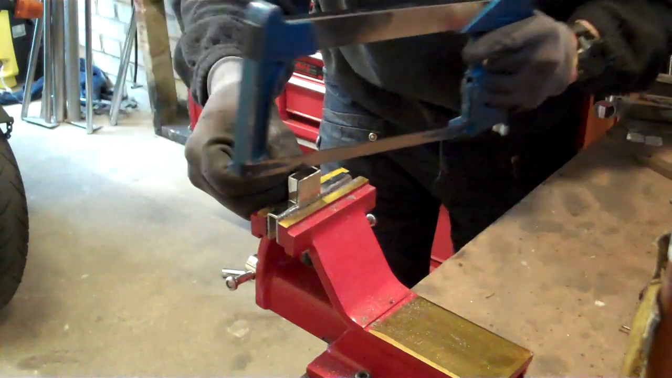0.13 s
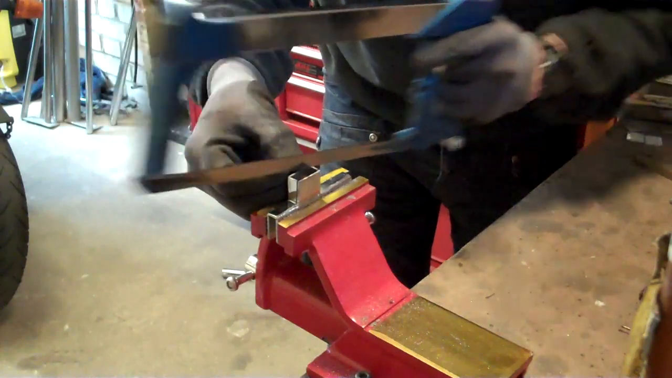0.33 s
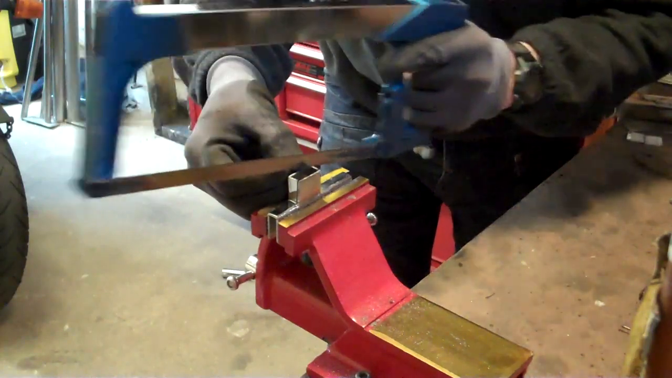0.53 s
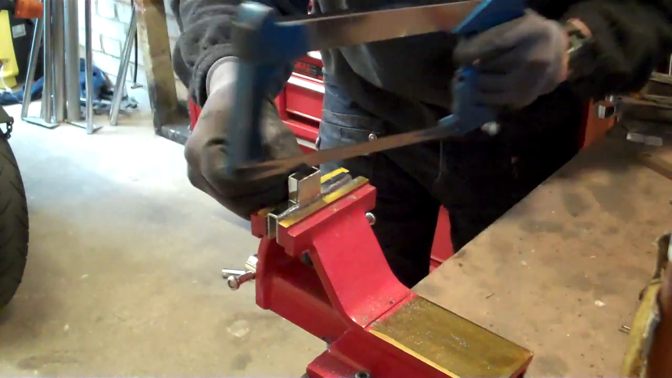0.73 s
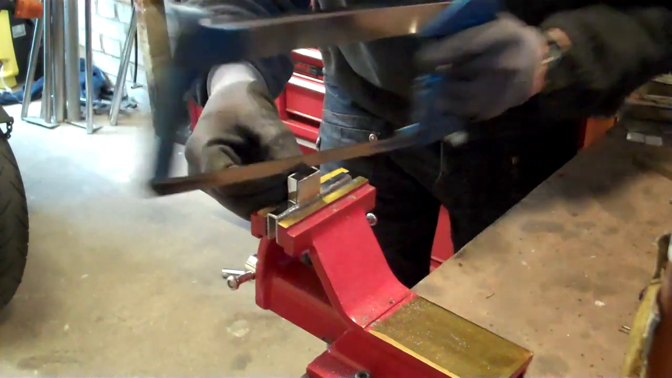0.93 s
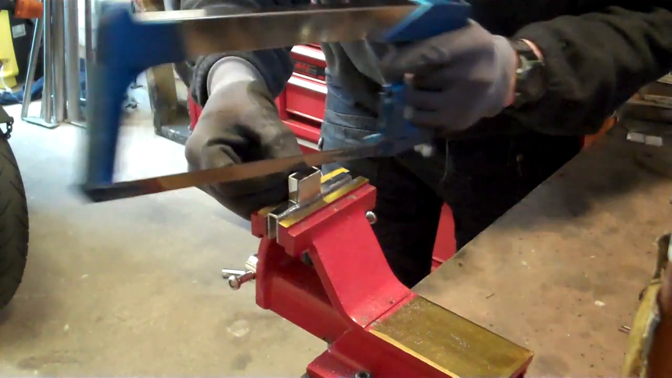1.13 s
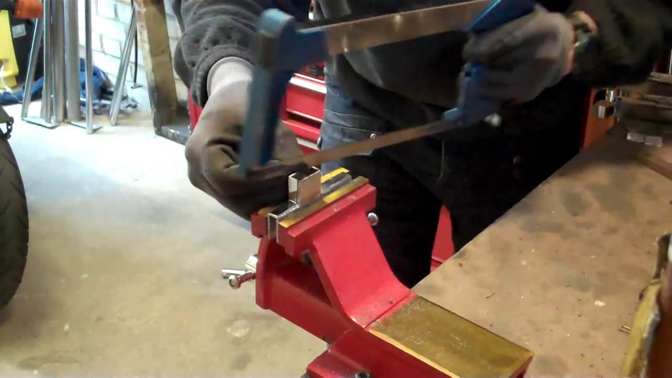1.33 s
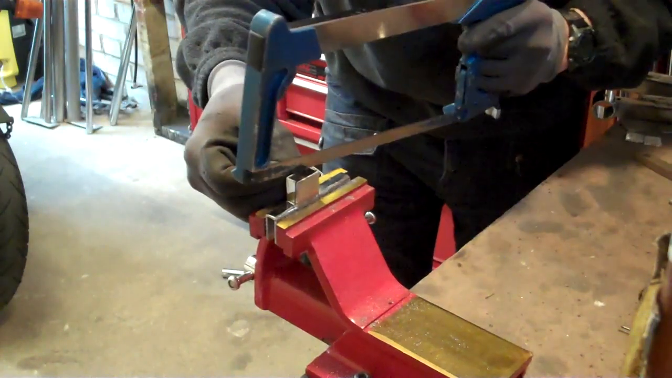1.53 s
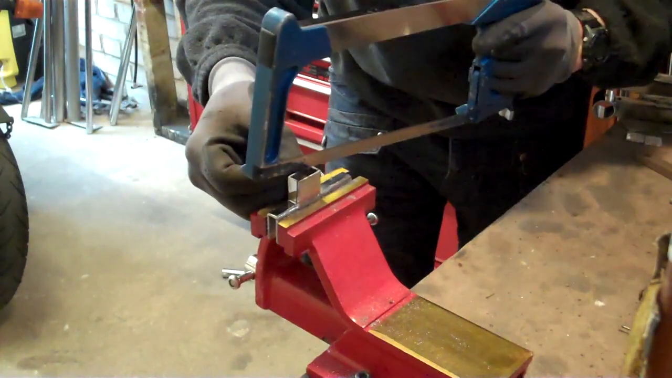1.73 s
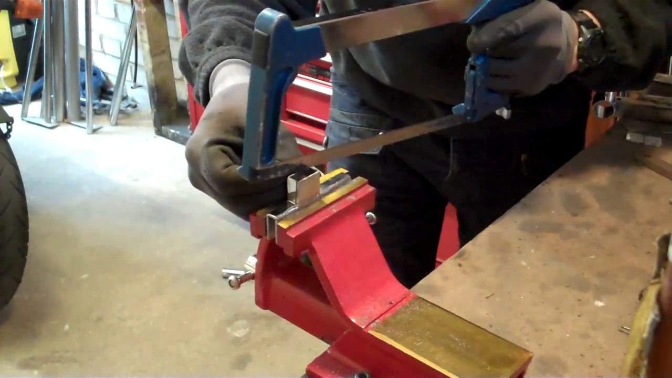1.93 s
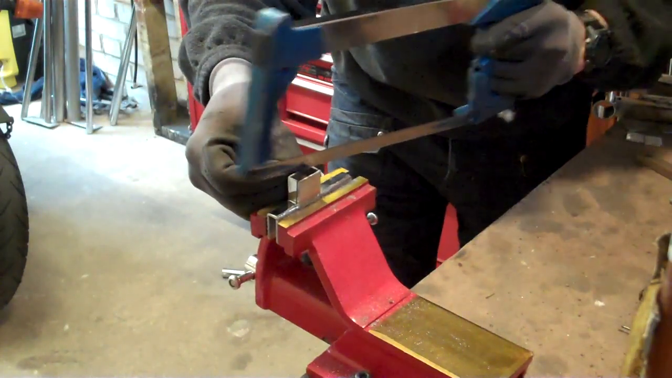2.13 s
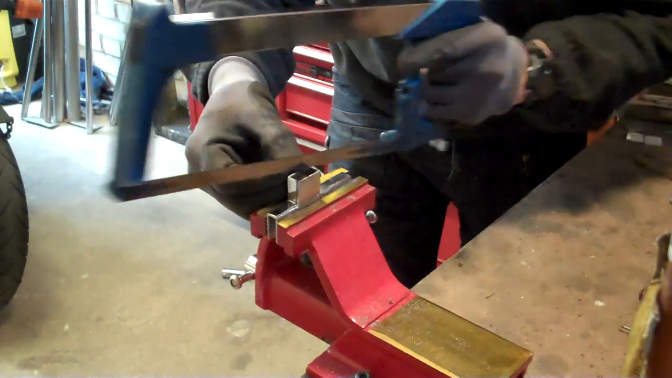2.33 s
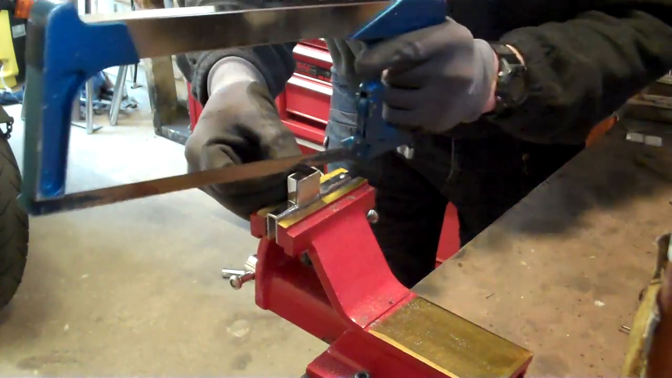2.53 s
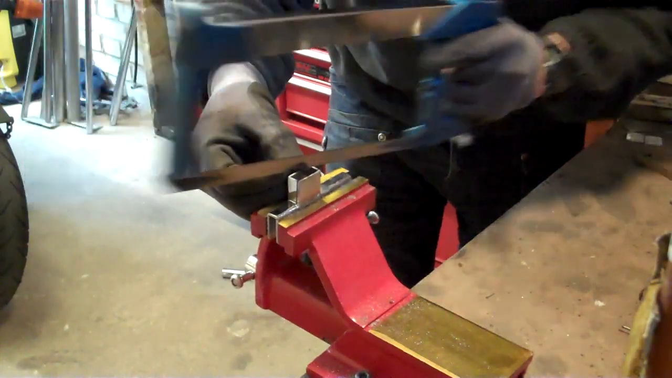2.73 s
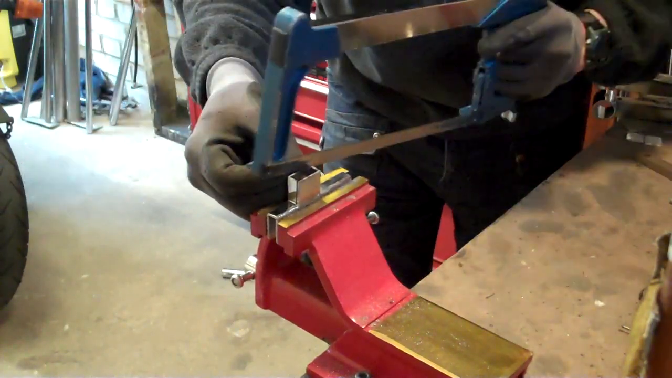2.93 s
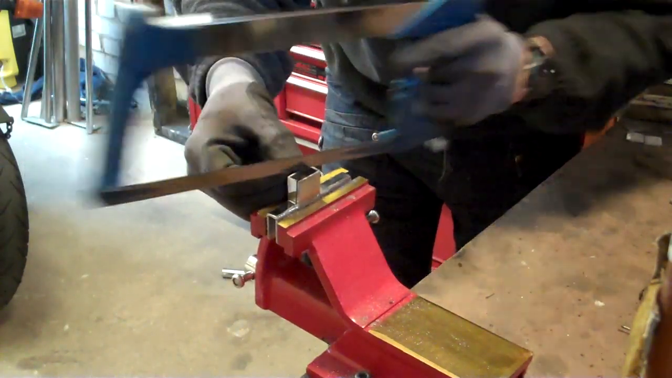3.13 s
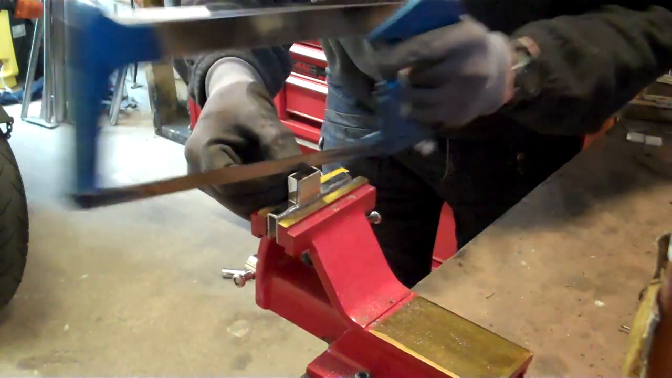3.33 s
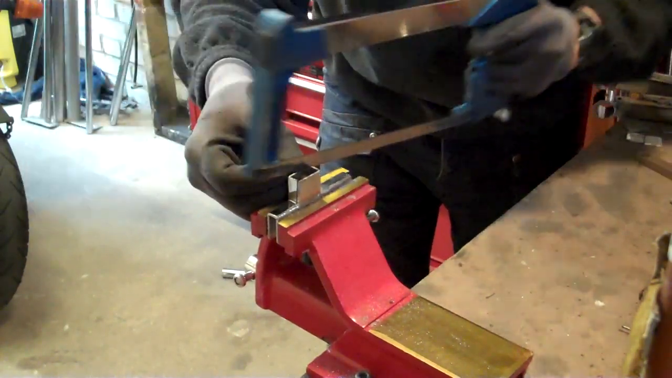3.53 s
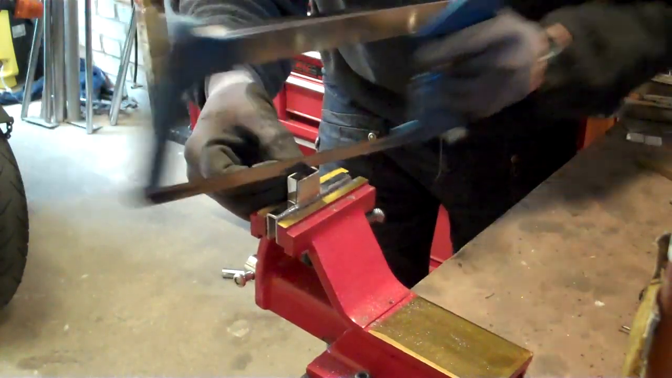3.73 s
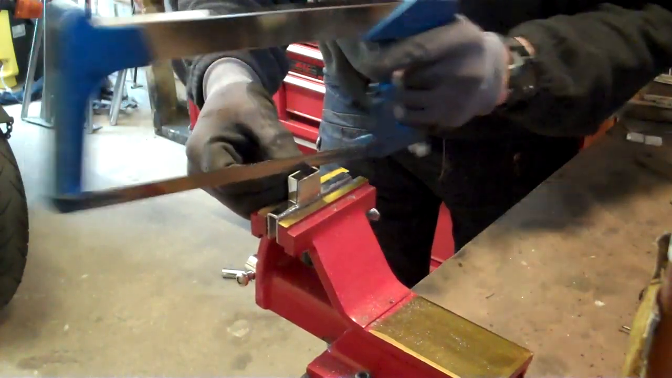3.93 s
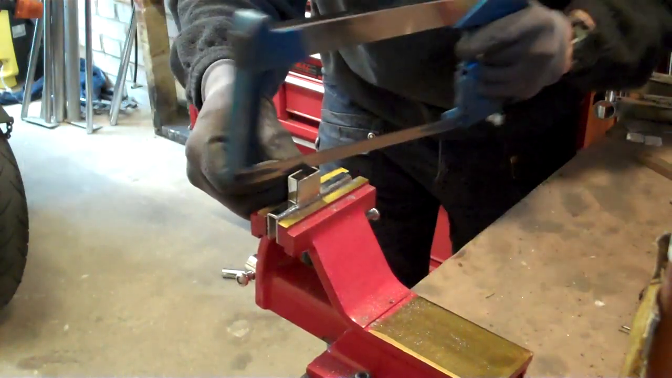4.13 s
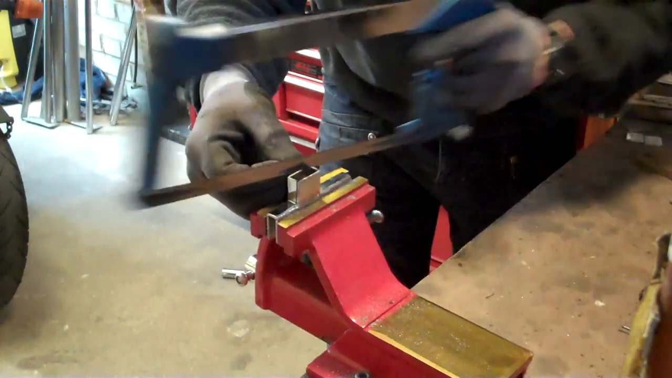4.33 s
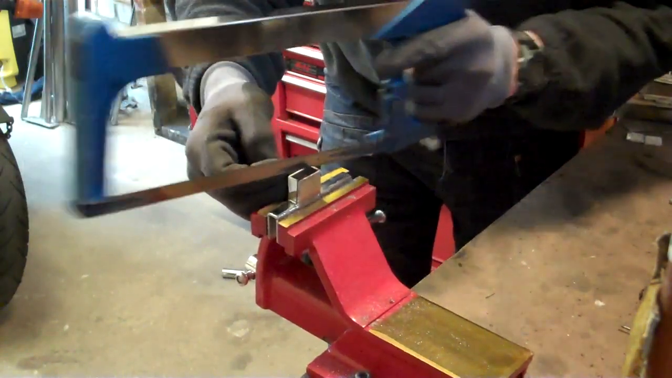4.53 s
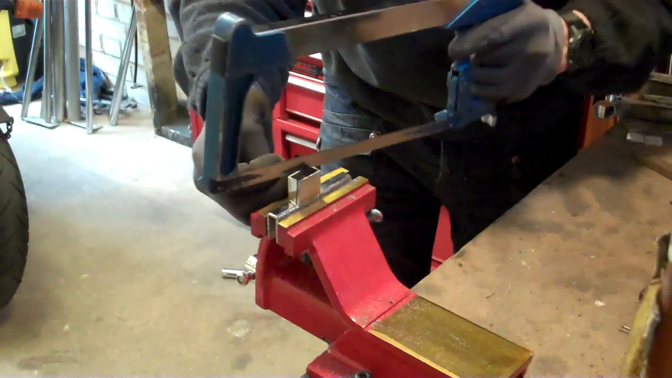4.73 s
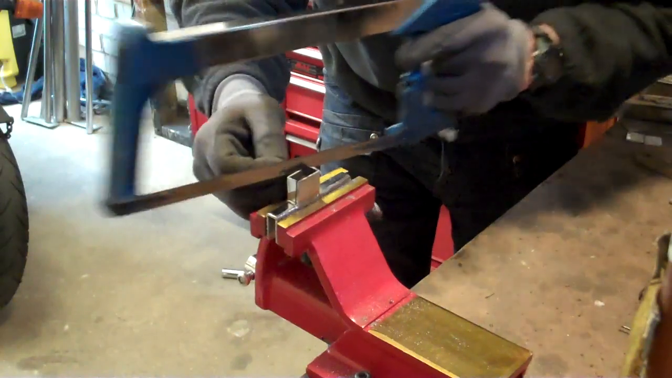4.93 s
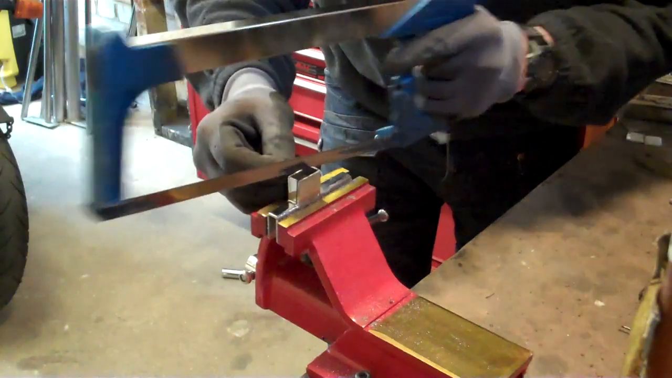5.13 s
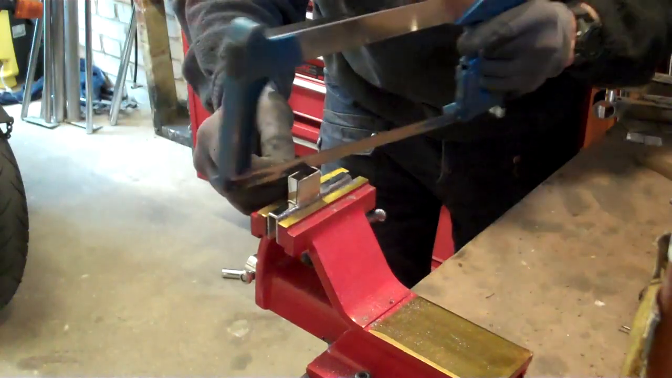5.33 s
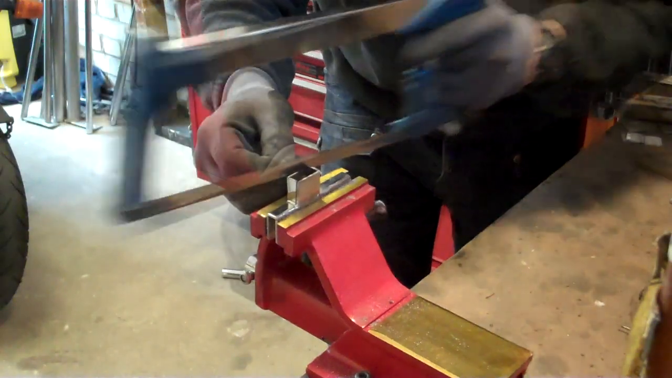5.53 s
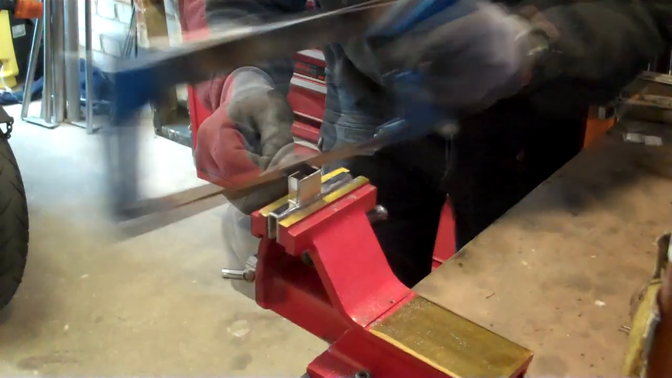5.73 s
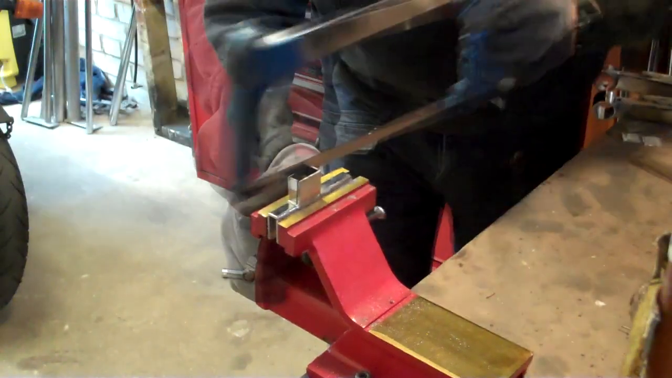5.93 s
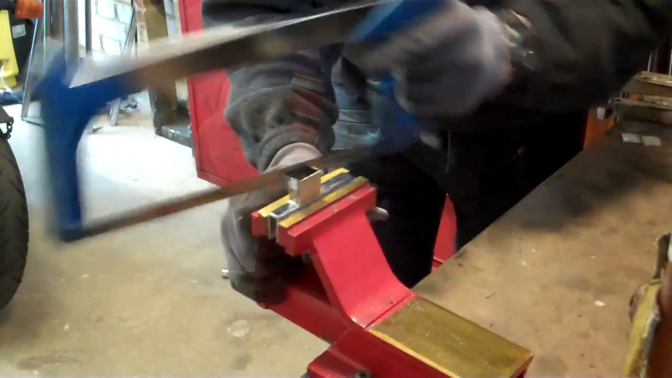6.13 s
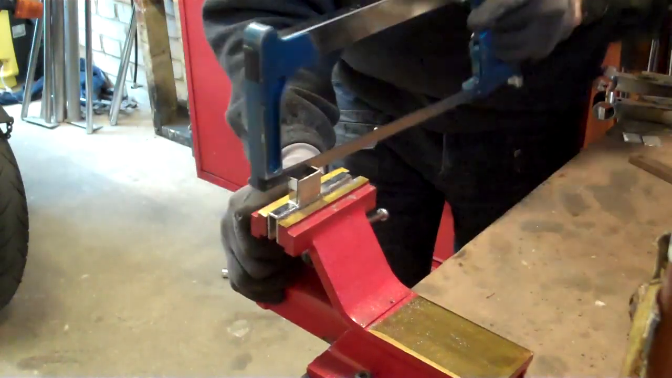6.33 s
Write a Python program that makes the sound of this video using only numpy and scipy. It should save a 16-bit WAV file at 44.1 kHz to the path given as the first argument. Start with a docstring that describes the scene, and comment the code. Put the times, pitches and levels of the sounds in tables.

```python
"""Hacksaw on a steel tube

In a garage, close to two microphone ports, a hand hacksaw cuts a tube in a bench vise and pauses once to reseat.
Tooth blows and tearing chips, paced by each stroke, drive resonant bodies: tube, blade, frame and bench.
Noise bursts and damped notes add snags, knocks, taps, low thumps and a squeak; swelling noise makes the rattles.
Short reflections surround the saw, and quiet room noise with a wavering hum lies behind it."""
import sys
import numpy as np
from scipy import signal
from scipy.fft import rfft, irfft, next_fast_len
from scipy.io import wavfile
from scipy.ndimage import uniform_filter1d, map_coordinates

SR = 44100
rng = np.random.default_rng(int(sys.argv[2]) if len(sys.argv) > 2 else 0)


def generate_wav(signal):
    """Clip the signal to [-1, 1] and save it as 16-bit WAV at the path in sys.argv[1]."""
    frames = np.transpose(np.atleast_2d(signal))
    scaled = np.clip(frames, -1, 1) * 32767
    pcm = np.round(scaled).astype(np.int16)
    wavfile.write(sys.argv[1], SR, pcm)


N = 285327

# Forward strokes. Each row: start in seconds, length in seconds, share of it spent swelling (0-1),
# then relative levels in dB of the tube ring, the blade rasp, and the frame and bench shake.
PUSHES = [(.28, .32, 0.42, -2.5, -1, 0.5), (.90, 0.31, 0.33, 0.5, .5, 1.5),
          (2.18, 0.33, 0.46, -1.5, -1, -1.5), (2.40, .25, 0.52, -5, -3.5, -1),
          (3.04, 0.31, 0.44, -1, 1, 2.5), (3.68, .30, 0.51, 1, 0, -0.5), (4.30, .29, 0.39, -1, -0.5, 1.5),
          (4.85, 0.36, 0.37, -1, -0.5, 0.5), (5.49, .26, .38, -1, -1.5, -1), (6.0, 0.2, 0.38, -1, 0, 1)]
# Return strokes. Each row: the same columns as the forward strokes.
PULLS = [(-.005, 0.29, 0.38, -0.5, -1, -0.52), (.60, 0.31, 0.38, .5, .5, 0.18),
         (1.20, 0.26, 0.46, 1, 0.5, 0.62), (2.65, .36, 0.47, 1.5, 0.5, 0.97), (3.38, .29, 0.43, 2, .5, 1),
         (4.0, 0.28, 0.54, .5, 0, 0.62), (4.59, .28, 0.44, 0, -0.5, -0.53),
         (5.19, .29, .45, 2.5, 0.5, 0.77), (5.77, 0.24, 0.36, -2, -3.5, -1.17),
         (6.22, 0.26, 0.33, -1.5, -2.5, 0.56)]
# The unloaded blade slides in the slot during the pause.
# Each row: start in seconds, length in seconds at which the fast fade begins, relative level in dB.
SLIDES = [(1.427, 0.22, -38.5), (1.735, .05, -41.5), (1.779, 0.22, -35), (2.061, 0.095, -43)]
# How hard each part is driven. Each holds: dB at full speed on the push, dB on the pull, drop at the turns in dB.
TUBE_DRIVE = (-16, -16.5, 23.4)
BLADE_DRIVE = (-20.5, -20, 20.46)
FRAME_DRIVE = (-28.5, -30.5, 15.6)
BENCH_DRIVE = (-34, -37, 6)

# Broad colour of the pressed tube, the lightly touched tube, blade, saw frame and bench.
# Each row: frequency in Hz, relative level in dB.
TUBE_COLOUR = [(3000, -42.5), (4600, -12.5), (5800, -11.5), (7000, -4.5), (8200, -5.5), (9000, -10.5),
               (10000, -17.5), (11500, -20), (14000, -22.5)]
FREE_TUBE_COLOUR = [(2000, -26), (5000, -15), (6500, -12), (7800, -2), (9000, -9), (10500, -20),
                    (14000, -36)]
BLADE_COLOUR = [(700, -42), (1150, -3.5), (1350, -7), (1600, -4), (2250, -1.5), (3300, 0), (4500, -2),
                (6000, -0.5), (9000, -33)]
FRAME_COLOUR = [(300, -30.5), (480, -9), (600, -0.5), (800, -1), (1100, 0.5), (1300, -22.5), (2000, -25)]
BENCH_COLOUR = [(25, -17), (60, -9), (110, -4.5), (200, -4.5), (400, -2.5), (520, -2.5), (800, -9),
                (2000, -70)]
# Resonances over those colours. Each row: frequency in Hz, width in Hz, height in dB on the push, on the pull.
TUBE_MODES = [(5780, 170, 9, 3.5), (6710, 146, 4.5, 2), (6985, 480, 4, 4), (7560, 223, 11, 11),
              (8240, 120, 5.5, 6.5), (10550, 200, 5.5, 3.5)]
FREE_TUBE_MODES = [(5840, 84, 16, 9), (7620, 100, 11.5, 16), (7870, 110, 16, 6)]
BLADE_MODES = [(1427, 55, 9.8, 8.8), (1572, 256, 9.1, 6.7), (1989, 80, 10.7, 6), (2482, 69, 5.6, 7.4),
               (2670, 150, 3.3, 1.8), (2944, 163, 7.7, 10.1), (3823, 285, 7.2, 6.8), (4963, 110, 9.2, 9.1)]
FRAME_MODES = [(692.3, 50, 10.5, 7), (778.4, 35, 7, 15), (879, 26, 2, 7), (1041, 53, 3.5, 5.5)]
BENCH_MODES = [(182, 12, 4.7, 1), (311.4, 60, 9.3, 7.6), (352.7, 84, 9.6, 5.7)]
# Bending modes of the free blade span on the pull. Each row: frequency at mid-stroke in Hz, relative level in dB.
SPAN_MODES = [(800, -4), (1560, -4.5)]

# A tooth catches hard on the tube wall. Each row: time in seconds, strength in dB, rasp against that in dB.
SNAGS = [(.0388, -7, -8), (.0812, 2.5, -12.5), (.3506, 0, -27), (.3925, 0, -5), (.5477, -12, -12),
         (.635, -11, -3), (.6915, 0, -12), (.758, -5, -3), (.831, -9.5, -20), (.9307, -11.5, -4),
         (.9996, 0, -8), (1.062, 0.5, -9), (1.284, -4, -3.5), (2.2173, -9.5, -20), (2.2348, -8, -9),
         (2.2942, -6, -19), (2.4204, -7, -2.5), (2.789, -3, -9), (3.0734, -7.5, -7), (3.1255, 0, -10),
         (3.2111, -4.5, -6), (3.5364, 0.5, -12), (4.1031, -2, -16), (4.17, -2, -10), (4.3218, -20, 0),
         (4.361, -3.5, -2), (4.3989, -2.5, -4), (4.4514, -7, -1.5), (4.8702, -14, -8), (5.0233, -6, 0),
         (5.1998, -14, -5), (5.3252, -3, -7)]
# The saw frame jolts the vise.
# Each row: time in seconds, strength in dB, frame ring against that in dB, bench ring in Hz.
KNOCKS = [(.393, -12.5, 0, 316), (0.922, -18, -13, 335), (1.007, -20.5, 7, 303), (1.064, -16.5, -3, 315),
          (1.784, -21, -13.5, 308), (1.865, -10, -12.5, 332.3), (2.065, -24, -19, 341.7),
          (2.299, -13, -4, 307.6), (2.337, -12, -3.5, 355.5), (3.08, -17, 4, 343.4),
          (3.128, -12, -0.5, 297), (3.217, -20.5, 1.5, 287), (3.781, -8, -8.5, 365),
          (3.814, -18.5, 1.5, 361), (4.365, -12, -2.5, 292), (5.558, -13, -6, 338), (5.628, -5.5, -18, 305),
          (5.74, -13.5, -30, 356), (6.05, -14, -1, 326), (6.178, -7, -26, 367)]
# The resting blade touches the tube. Each row: time in seconds, strength in dB.
TAPS = [(1.521, -22), (1.7394, -17), (1.797, -9.5), (1.8686, -16), (1.8805, -19), (1.952, -19),
        (2.1208, -15)]
# Short, deep thumps around 48 Hz. Each row: time in seconds, level in dB.
THUMPS = [(.081, -31), (0.39, -35), (.691, -39), (.999, -42), (3.778, -33)]
# The bench rocks and rattles under the later strokes.
# Each row: time of its height in seconds, length in seconds, rattle level in dB, deep boom level in dB.
RATTLES = [(3.166, 0.15, -31, -48), (3.782, 0.15, -28, -32.5), (4.577, 0.3, -33, -44),
           (5.029, 0.27, -28.5, -41), (5.614, 0.2, -25.5, -32), (6.15, 0.26, -28, -36.5),
           (6.372, 0.38, -29.5, -40)]
# Colour of the rattle and of the boom. Each row: frequency in Hz, relative level in dB.
RATTLE_COLOUR = [(60, -34.5), (130, -8.5), (220, -4), (260, -8.5), (380, -0.5), (480, -6.5), (800, -33)]
BOOM_COLOUR = [(30, -31), (50, -16), (64, 2), (82, -7), (105, 5.5), (135, -6), (200, -22)]
# Resonances of the rattle. Each row: frequency in Hz, width in Hz, height in dB, an unused second height.
RATTLE_MODES = [(168, 27, 9, 5), (215, 13, 10, 4), (301, 75, 8.5, 7), (351, 69, 8, 8)]

# Level between the microphone ports. Each row: frequency in Hz, left minus right in dB.
LEFT_OVER_RIGHT = [(100, 1.3), (500, -1), (1400, 1), (2800, 2.5), (5000, 2), (7500, 7.5), (10000, 10.5),
                   (13000, 18)]
# Each resonance reaches the two ports with its own phase. Each row: frequency in Hz, lead of the left in radians.
PORT_PHASE = [(0, -0.022), (2500, 0.025), (2930, -0.14), (3360, -1), (3790, -1.2), (4820, -1.4),
              (5170, -0.38), (5770, -1.46), (6550, -0.45), (7670, 1), (8700, -1.3), (10800, -1),
              (13600, -1.1), (14600, -0.25)]
# The right port's rasp from other stretches of the blade. Each row: frequency in Hz, share of power (0-1).
SCATTERED = [(500, .01), (1200, .08), (2200, .42), (4000, .68), (13000, .85)]
# Reflections against the direct sound. Each row: frequency in Hz, level in dB.
WET = [(100, -23.5), (500, -17), (1200, -9.5), (2800, -6.5), (7000, -10.5), (13000, 1)]
# Decay of the garage. Each row: frequency in Hz, time to fall 60 dB in seconds.
GARAGE = [(200, 0.11), (2000, 0.14), (8000, 0.19), (14000, 0.049)]
# Colour of the garage background. Each row: frequency in Hz, relative level in dB.
FLOOR = [(15, -46), (25, -24), (60, -16), (80, 2), (100, 4.5), (244, -15), (335, -18), (554, -17),
         (684, -13), (1290, -19), (3440, -23), (5840, -18), (6330, -17), (7610, -16), (14000, -40)]

STROKE_TEETH = 175  # teeth across the tube wall in one stroke, before the pace wavers
SWELL_POWER, FADE_POWER = 2.38, 1.52  # bend of the level's rise and fall: higher holds the top longer
STOP_DB_PER_S = 247  # extra fade beyond either end of a stroke, or after a slide
SLIDE_RISE_S, SLIDE_FADE_DB_PER_S = 0.0093, 81
SNAG_T60_S = .035  # chatter after a catch
CATCH_DB, CATCH_SPREAD_DB = 5, 6.5  # lesser catches: strength against the tube's drive, and scatter either way
CATCH_RASP_DB = -4.5  # their rasp against their crack
TOP_HZ = 14250  # band limit


def sawing(levels_db, shake_db):
    """The cut drives tube, blade, frame and bench; the saw rings differently when pushed and pulled."""
    tube_db, blade_db, frame_db, bench_db = levels_db
    push, pull = tooth_rate(PUSHES), tooth_rate(PULLS)
    pulling = pull > 1
    judder_db = shake_db * np.where(pulling, .85, 1.15)

    def part(colour, modes, tooth_share, own_db):
        """One body driven by its own draw of the cutting force."""
        force = cutting_force(push + pull, tooth_share, scatter_db=5.5, judder_db=judder_db + own_db * wobble(300))
        pushed = ring(force * ~pulling, colour, modes)
        pulled = ring(force * pulling, colour, modes, pulling=True)
        return unit(pushed + pulled)

    pressed = flaring(part(TUBE_COLOUR, TUBE_MODES, tooth_share=0.36, own_db=2.9), depth_db=3.5)
    free = part(FREE_TUBE_COLOUR, FREE_TUBE_MODES, tooth_share=0.088, own_db=3.5)
    # a light touch damps the tube less, so its main mode sings out at the turns
    lightness = 0.73 / (1.5 + np.exp((tube_db + 31.5) / 5))
    tube = np.sqrt(1 - lightness) * pressed + np.sqrt(lightness) * free
    blade = flaring(part(BLADE_COLOUR, BLADE_MODES, tooth_share=0.22, own_db=0.25), depth_db=3.0)
    frame = part(FRAME_COLOUR, FRAME_MODES, tooth_share=0.15, own_db=0.3) + blade_span(glide=.22, width_hz=42)
    bench = part(BENCH_COLOUR, BENCH_MODES, tooth_share=0.075, own_db=2.3)
    return amp(tube_db) * tube + amp(blade_db) * blade + amp(frame_db) * frame + amp(bench_db) * bench


def tooth_rate(strokes):
    """Teeth per second: the blade speeds up from rest and stops again; a shorter stroke is a faster one."""
    t, rate = np.arange(N) / SR, np.zeros(N)
    for start, length, *_ in strokes:
        fastest = STROKE_TEETH * np.pi / (2 * length)
        rate += fastest * np.sin(np.pi * np.clip((t - start) / length, 0, 1))
    return rate


def cutting_force(rate, tooth_share, scatter_db, judder_db):
    """One blow per tooth plus the tearing of its chip; the hand-held blade judders."""
    passed = np.cumsum((rate + 40) * amp(.35 * wobble(70))) / SR  # teeth so far
    blows = np.diff(np.floor(passed), prepend=0) * amp(scatter_db * rng.standard_normal(N))
    blows = unit(blows / np.sqrt(rate + 200))
    tearing = unit(rng.standard_normal(N) * np.exp(-1.2 * (passed % 1)))
    share = tooth_share * rate / rate.max()  # separate blows count most at full speed
    return unit((np.sqrt(share) * blows + np.sqrt(1 - share) * tearing) * amp(judder_db))


def flaring(x, depth_db):
    """Resonances flare and fade as the contact moves along the blade."""
    spectrum = signal.stft(x, nperseg=512)[2]
    field = uniform_filter1d(rng.standard_normal(spectrum.shape), 2, 0)  # smooth over frequency
    field = uniform_filter1d(field, 9, 1)  # and over time
    return unit(signal.istft(spectrum * amp(depth_db * unit(field)), nperseg=512)[1][:N])


def blade_span(glide, width_hz):
    """The free span of the blade sings a rough note that sinks through each pull."""
    along_pull, out = travel(PULLS), np.zeros(N)
    for hz, db in SPAN_MODES:
        phase = 2 * np.pi * np.cumsum(hz * (1 + glide * (.5 - along_pull))) / SR
        out += amp(db) * (wobble(width_hz) * np.sin(phase) + wobble(width_hz) * np.cos(phase))
    return out * np.sin(np.pi * along_pull)


def travel(strokes):
    """How far the blade is through its stroke, 0-1; zero between these strokes."""
    t, out = np.arange(N) / SR, np.zeros(N)
    for start, length, *_ in strokes:
        inside = (t >= start) & (t < start + length)
        out[inside] = (t[inside] - start) / length
    return out


def drive(law, column, slide_db):
    """Level of one part in dB, from the pushes, the pulls and the light slides, added as powers."""
    push_db, pull_db, drop_db = law
    power = amp(push_db) ** 2 * stroke_power(PUSHES, drop_db, column)
    power += amp(pull_db) ** 2 * stroke_power(PULLS, drop_db, column)
    for s, length, db in SLIDES:
        age = np.maximum(np.arange(N) / SR - s, 0)
        fade_db = SLIDE_FADE_DB_PER_S * age + STOP_DB_PER_S * np.maximum(age - length, 0)
        power += ((1 - np.exp(-age / SLIDE_RISE_S)) * amp(db + slide_db - fade_db)) ** 2
    return 10 * np.log10(power + 1e-12)


def stroke_power(strokes, drop_db, column):
    """Each stroke swells to its loudest point and fades towards the turn."""
    t, power = np.arange(N) / SR, np.zeros(N)
    for start, length, share, *levels_db in strokes:
        near = np.abs(t - start - length / 2) < length
        u = (t[near] - start) / length  # 0-1 through the stroke
        swell = np.clip(1 - u / share, 0, 1) ** SWELL_POWER
        fade = np.clip((u - share) / (1 - share), 0, 1) ** FADE_POWER
        outside_s = np.maximum(np.abs(u - .5) - .5, 0) * length
        level_db = dict(zip(("ring", "rasp", "shake"), levels_db))[column]
        power[near] += amp(level_db - drop_db * (swell + fade) - STOP_DB_PER_S * outside_s) ** 2
    return power


def snags(tube_db, count=24):
    """A caught tooth breaks free with a bright crack and a short chatter; lesser catches come by chance."""
    at = rng.integers(0, N, count)
    strength_db = tube_db[at] + CATCH_DB + CATCH_SPREAD_DB * rng.uniform(-1, 1, count)
    lesser = np.column_stack([at / SR, strength_db, np.full(count, CATCH_RASP_DB)])
    s, db, rasp_db = np.vstack([SNAGS, lesser]).T
    crack = bursts(s, db - 8.5, rise=0.00035, t60=SNAG_T60_S)
    rasp = bursts(s, db + rasp_db - 8.5, rise=0.00072, t60=SNAG_T60_S)
    return ring(crack, TUBE_COLOUR, TUBE_MODES) + ring(rasp, BLADE_COLOUR, BLADE_MODES)


def taps():
    """With no pressure on it the tube rings clearer; the teeth skitter briefly after each touch."""
    s, db = np.transpose(TAPS)
    touch = bursts(s, db - 2.5, rise=0.00034, t60=0.0067)
    skitter = bursts(s, db - 13.0, rise=.002, t60=0.073)
    return ring(touch + skitter, FREE_TUBE_COLOUR, FREE_TUBE_MODES)


def squeak(start, level_db, pitch_hz):
    """The blade squeaks once as it slips back into the slot: a noise burst through a narrow resonance."""
    rub = bursts([start], [level_db], rise=0.0054, t60=0.053)
    return ring(rub, [(4000, -32), (4900, 3), (6000, -21)], [(pitch_hz, 300, 12, 12)])


def knocks():
    """A jolt thumps the bench and rings both it and the lowest mode of the saw frame."""
    s, db, frame_db, bench_hz = np.transpose(KNOCKS)
    thump = ring(bursts(s, db - 14.0, rise=0.0011, t60=0.065), BENCH_COLOUR, BENCH_MODES)
    bench = tones(s, db - 13.5, bench_hz, rise=0.0038, t60=.12)
    clack = ring(bursts(s, db + frame_db - 6, rise=0.0033, t60=0.046), FRAME_COLOUR, FRAME_MODES)
    frame = tones(s, db + frame_db - 3, pitches_hz=680.0, rise=0.0014, t60=0.11)
    return thump + bench + clack + frame


def low_thumps():
    """Soft, deep, quickly damped low notes at the listed times."""
    s, db = np.transpose(THUMPS)
    return tones(s, db, pitches_hz=48, rise=0.0018, t60=0.041)


def rattles(lumpy_db):
    """The rocking bench rattles and booms in uneven swells of noise."""
    t = np.arange(N) / SR
    s, length, rattle_db, boom_db = np.transpose(RATTLES)[..., None]
    swells = np.cos(np.pi * np.clip((t - s) / length, -.5, .5))

    def shaking(db):
        """Lumpy noise under all the swells."""
        lumpy = unit(rng.standard_normal(N) * amp(lumpy_db * wobble(70)))
        return (amp(db) * swells).sum(axis=0) * lumpy

    return ring(shaking(rattle_db), RATTLE_COLOUR, RATTLE_MODES) + ring(shaking(boom_db), BOOM_COLOUR, [])


def microphones(cut, elsewhere, hits):
    """The left port faces the cut; the right is shaded in the treble and hears more of the rest of the saw."""
    def share(hz):
        return np.outer([0, 1], along(SCATTERED, hz))

    def wet(hz):
        return amp(along(WET, hz))

    def phase(hz):
        return np.exp(np.outer([.5j, -.5j], along(PORT_PHASE, hz)))

    def ports(hz):
        level = amp(np.outer([.5, -.5], along(LEFT_OVER_RIGHT, hz)))
        return level / level.mean(axis=0) / np.sqrt(1 + wet(hz) ** 2)

    rasp = filtered(cut, lambda hz: np.sqrt(1 - share(hz)))
    rasp = rasp + filtered(elsewhere, lambda hz: np.sqrt(share(hz)))
    direct = filtered(rasp + hits, phase)
    room = filtered(reflections(cut + hits, GARAGE), wet)
    return filtered(direct + room, ports)


def reflections(x, decay, size=8192):
    """Surfaces around the cut answer; the pattern shifts as the saw and arms move."""
    out = np.zeros((2, N + SR))
    padded, window = np.pad(x, size), signal.get_window("hann", 2 * size)
    for start in range(0, N + size, size):
        # a fresh decaying noise tail for each overlapping piece
        hz, t, z = signal.stft(rng.standard_normal((2, SR // 4)), SR, nperseg=256)
        tail = signal.istft(z * amp(-60 * t / along(decay, hz)[:, None]), SR, nperseg=256)[1]
        tail = tail / np.linalg.norm(tail, axis=1, keepdims=True)
        piece = padded[start:start + 2 * size]
        answer = signal.fftconvolve((piece * np.sqrt(window[:len(piece)]))[None], tail, axes=1)
        out[:, start:start + answer.shape[1]] += answer
    return out[:, size:size + N]


def background():
    """Quiet room noise, partly shared by both ports, with a faint, wavering hum."""
    noise = rng.standard_normal(N) + 0.46 * rng.standard_normal((2, N))
    room = unit(filtered(noise, lambda hz: amp(along(FLOOR, hz))))
    hum = np.sin(2 * np.pi * 67 * np.arange(N) / SR + 1.0 * wobble(8)) * amp(3.4 * wobble(17))
    return amp(-50.0) * room + amp(-53) * hum


def ring(x, colour, modes, pulling=False, size=8192):
    """x through a causal, minimum-phase body of unit energy: a broad colour with resonances on it."""
    hz = np.fft.rfftfreq(size, 1 / SR)
    db = along(colour, hz)
    for centre, width, push_db, pull_db in modes:
        db = db + (pull_db if pulling else push_db) / (1 + (2 * (hz - centre) / width) ** 2)
    cepstrum = irfft(np.log(amp(db)))[:size // 2]
    response = irfft(np.exp(rfft(2 * cepstrum, size)))
    return signal.oaconvolve(x, response / np.linalg.norm(response))[:N]


def bursts(times, levels_db, rise, t60):
    """Short bursts of noisy chatter that swell and die away."""
    out, t = np.zeros(N + SR), np.arange(SR // 5) / SR
    shape = (1 - np.exp(-t / rise)) * amp(-60 * t / t60)
    for s, db in zip(times, levels_db):
        out[round(s * SR):][:len(t)] += amp(db) * shape / shape.max() * rng.standard_normal(len(t))
    return out[:N]


def tones(times, levels_db, pitches_hz, rise, t60):
    """Damped notes whose phase wanders a little."""
    out, t = np.zeros(N + SR), np.arange(SR // 4) / SR
    shape = (1 - np.exp(-t / rise)) * amp(-60 * t / t60)
    for s, db, hz in np.broadcast(times, levels_db, pitches_hz):
        wander = 0.028 * np.cumsum(rng.standard_normal(len(t)))
        out[round(s * SR):][:len(t)] += amp(db) * shape / shape.max() * np.sin(2 * np.pi * hz * t + wander)
    return out[:N]


def filtered(x, response):
    """x times a response of frequency."""
    m = next_fast_len(N + SR // 4)
    return irfft(rfft(x, m) * response(np.fft.rfftfreq(m, 1 / SR)), m)[..., :N]


def wobble(rate):
    """A smooth random curve, rate knots a second."""
    return map_coordinates(rng.standard_normal(int(N * rate / SR) + 4), [np.arange(N) * rate / SR])


def along(points, hz):
    """Values between (Hz, value) points on a log axis."""
    f, v = np.transpose(points)
    return np.interp(np.log(hz + 1), np.log(f + 1), v)


def amp(db):
    """Decibels to gain."""
    return 10 ** (np.asarray(db) / 20)


def unit(x):
    """Scaled to rms 1."""
    return x / np.sqrt(np.mean(x ** 2) + 1e-20)


def scene():
    """The saw, close to the microphones, in the garage; one judder of the hand shakes the whole cut."""
    shake_db = 1.29 * wobble(220) + 1.47 * wobble(60)
    levels_db = [drive(TUBE_DRIVE, "ring", slide_db=4), drive(BLADE_DRIVE, "rasp", slide_db=-1.5),
                 drive(FRAME_DRIVE, "shake", slide_db=-3), drive(BENCH_DRIVE, "shake", slide_db=2)]
    hits = snags(levels_db[0]) + taps() + knocks() + low_thumps() + rattles(lumpy_db=4)
    hits += squeak(start=2.149, level_db=-27, pitch_hz=4870)
    cut = sawing(levels_db, shake_db)
    elsewhere = sawing(levels_db, shake_db)  # other stretches of the blade
    return amp(1.11) * microphones(cut, elsewhere, hits) + background()


def record(dry):
    """The loudest peaks are rounded off, then a steep filter removes what lies above the band limit."""
    clipped = dry / (1 + np.abs(dry / .97) ** 8) ** (1 / 8)
    return filtered(clipped, lambda hz: 1 / np.sqrt(1 + (hz / TOP_HZ) ** 200))


dry = scene()
out = record(dry)
generate_wav(out)
```